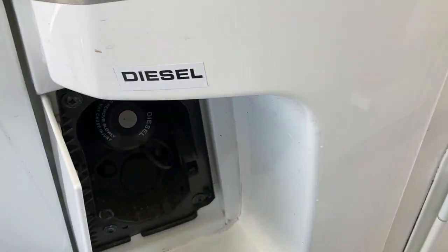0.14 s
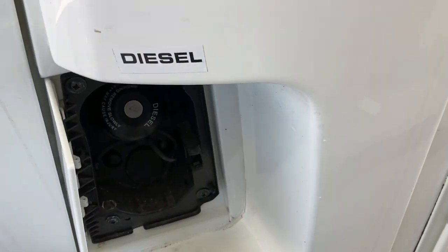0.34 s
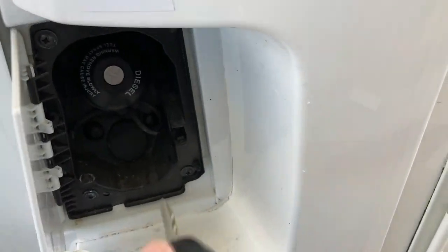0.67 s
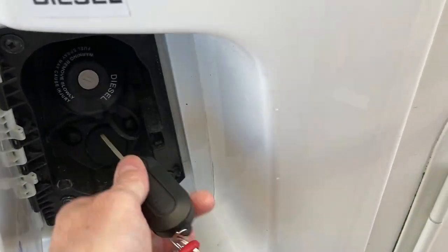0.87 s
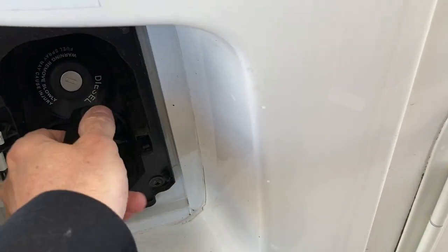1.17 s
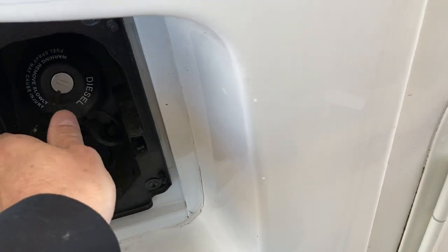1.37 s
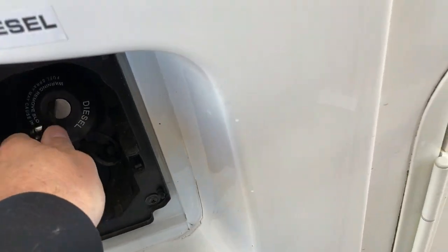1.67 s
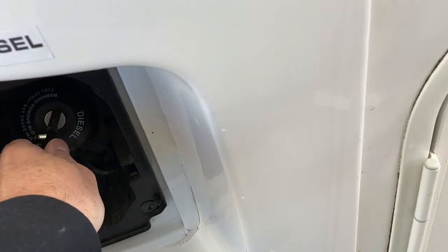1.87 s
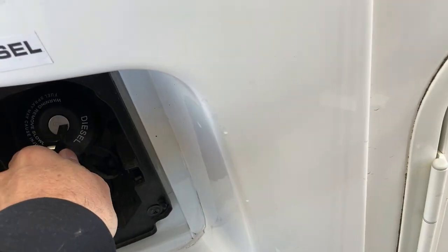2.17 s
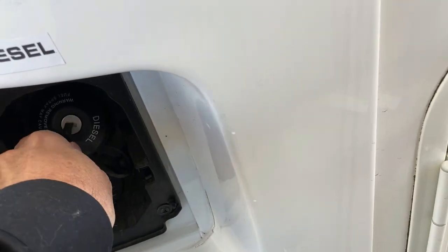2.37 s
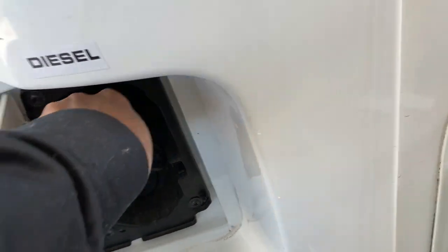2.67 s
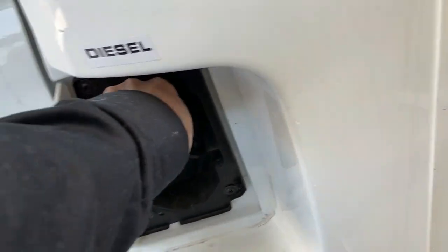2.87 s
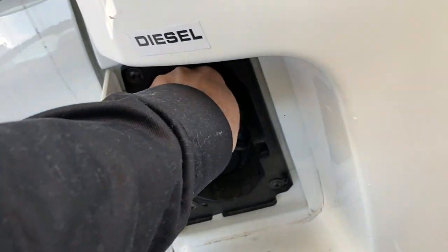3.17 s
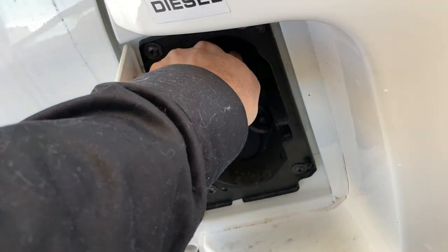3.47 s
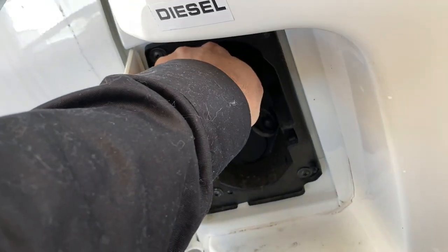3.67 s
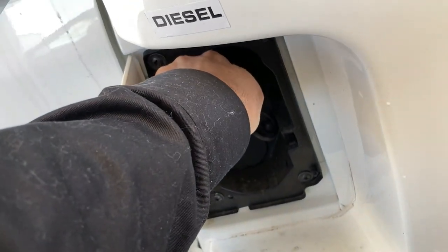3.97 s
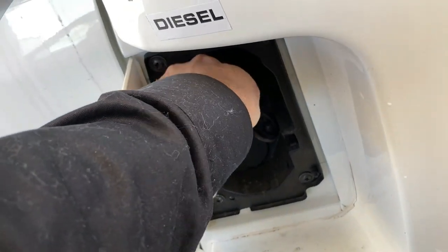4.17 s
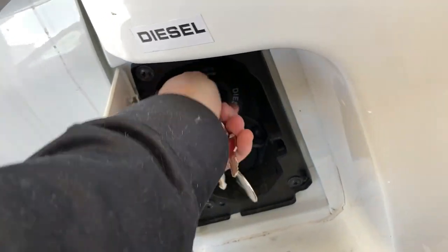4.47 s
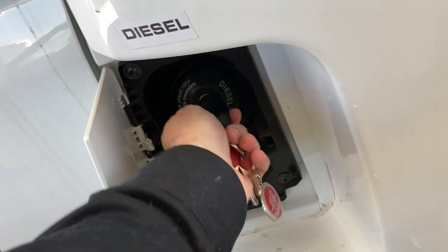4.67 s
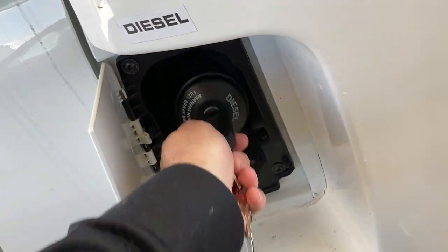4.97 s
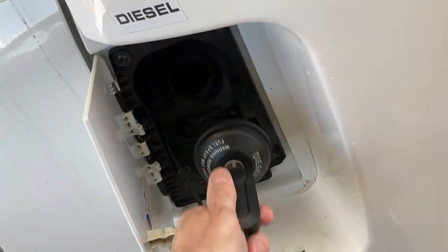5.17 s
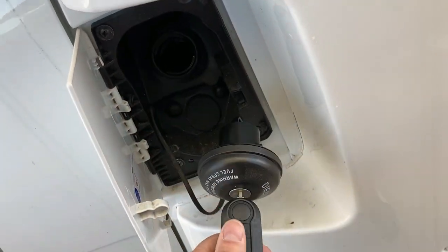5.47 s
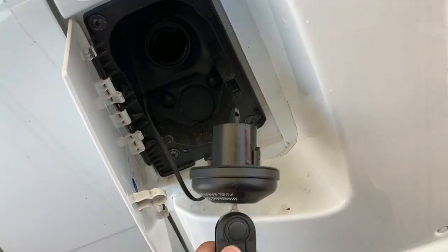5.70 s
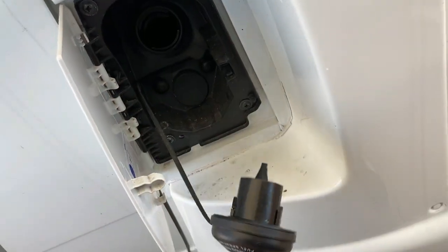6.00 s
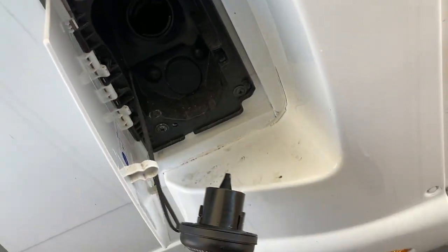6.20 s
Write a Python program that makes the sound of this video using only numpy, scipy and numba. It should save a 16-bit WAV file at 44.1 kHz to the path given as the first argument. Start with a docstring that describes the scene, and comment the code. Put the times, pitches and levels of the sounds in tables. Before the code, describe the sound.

Over a faint low traffic rumble and hum, a bunch of keys jingles brightly while a van door shuts with a deep double thump. Then, very close, a key knocks and scrapes into a hollow plastic fuel cap, with sleeve rustle and soft taps. After a quieter stretch, a loud burst of clacks and rattle frees the cap, leaving small touches.

```python
"""Over a low forecourt rumble and a wavering hum, a bunch of keys jingles as a van's door slams.
A key is then worked into a locking plastic filler cap, with knocks, scrapes and soft taps, until
the cap comes free. Keys, panel and door are fading sine tones; the recess around the filler rings
with the knocks and colours the scrapes; rumble and rustle are shaped noise. Two close microphone
ports hear it all."""
import sys
import numpy as np
from scipy import signal
from scipy.fft import rfft, irfft, next_fast_len
from scipy.io import wavfile
from numba import njit

SR = 44100
rng = np.random.default_rng(int(sys.argv[2]) if len(sys.argv) > 2 else 0)


def store_pcm(level_fs):
    """Save levels as 16-bit WAV."""
    pcm = np.round(np.clip(level_fs, -1, 1) * 32767).astype(np.int16)
    wavfile.write(sys.argv[1], SR, np.atleast_2d(pcm).T)


N = 279578   # length in samples

# Levels in the tables are relative: the functions may add a fixed trim to a whole layer.
# Spectra give the loudness of noise at each pitch: pitch_hz, level_db.
# Modes are the tones a thing rings with: pitch_hz, level_db, t60_s (time to fade by 60 dB).

# spectrum of the forecourt rumble: pitch_hz, level_db
FORECOURT_SPECTRUM = [(25, -31.5), (50, 8.5), (70, 9.5), (110, -3), (160, -6.5), (300, -9), (500, -19),
                      (1000, -34), (2000, -31), (4000, -60.5)]
FORECOURT_DB = -53.5
# low tones of the hum: pitch_hz, level_db
HUM_TONES = [(55, -62.5), (118, -64), (152, -63.5), (236, -56)]

# thumps of the shutting door: start_s, level_db
DOOR_SLAMS = [(.218, -8.5), (0.267, -8)]
# booming modes of the van body: pitch_hz, level_db, t60_s
BODY_BOOM = [(75, -12.5, 0.23), (129.7, 2.5, 0.22), (141.5, 2, 0.26), (175.5, -11.5, 0.39)]
# sheet metal of the door ringing just after the second slam: start_s, then modes (pitch_hz, level_db, t60_s)
DOOR_SKIN_RING = (.275, [(538, -20, 0.19)])
LATCH_S, LATCH_DB = .028, -8   # this long after each slam the latch damps the boom by this much

# hand and arm at the panel: start_s, strain_db, rustle_db
HAND_LEVELS = [(0, -36, -53), (.2, -50, -45.5), (.6, -45.5, -57), (1.0, -50.5, -55.5), (1.22, -45.5, -54.5),
               (1.318, -46, -60.5), (2.05, -48.5, -65.5), (2.17, -46, -60.5), (3.0, -38, -57),
               (3.139, -49.5, -62.5), (4.12, -56.5, -65), (4.34, -42, -59.5), (4.652, -40, -57.5),
               (5.5, -58, -61), (6.34, -60, -65)]
# spectrum of the strain rumble: pitch_hz, level_db
STRAIN_SPECTRUM = [(60, -24), (110, 9.5), (180, 0.5), (250, -4.5), (400, -13), (700, -18), (1200, -52)]
# spectrum of the hand and sleeve rustle: pitch_hz, level_db
RUSTLE_SPECTRUM = [(400, -25.5), (800, 11.5), (2000, 9), (4000, 5.5), (8000, 2), (12000, 3.5),
                   (15500, -3.5), (16000, -22)]
# stretches where the rustle fades out and then quickly returns: start_s, end_s
RUSTLE_DIPS = [(3.519, 4.13), (5.5, 5.645)]
DIP_FADE_DB_PER_S, DIP_FADE_S, RETURN_S = 86, 0.31, 0.017

# the clearer bright ticks, mostly of keys touching: start_s, level_db
BRIGHT_TICKS = [(0.1675, -19.5), (0.218, -26), (0.315, -34), (0.396, -31), (0.4351, -23.5), (0.4669, -22.5),
                (0.4874, -23), (0.5218, -18), (0.5543, -28), (0.614, -33), (0.689, -26), (0.6949, -28.5),
                (0.7193, -23), (0.909, -31), (0.9655, -38), (1.014, -37), (1.051, -29), (1.115, -30),
                (1.1555, -30.5), (1.174, -26), (1.206, -21), (1.246, -34), (1.6358, -23), (2.34, -32),
                (2.7073, -28), (2.875, -26.5), (4.13, -49), (4.6216, -9)]
# spectrum of a tick: pitch_hz, level_db
TICK_SPECTRUM = [(1500, -24), (4000, -3.5), (5500, 5), (7500, 5), (9000, 6.5), (12000, 1.5), (14500, -7.5),
                 (17000, -28)]
# what an early tick leaves sounding: pitch_hz, level_db, t60_s
TICK_MODES = [(2275, -17, 0.02), (4120, -10, 0.0097), (15050, -15.5, 0.015)]
# while the bunch swings free, faint ticks come at random
SWING_START_S, SWING_END_S, FAINT_TICKS, FAINT_DB = .05, 1.26, 18, -47
# touches that leave the keys ringing: start_s, keys_db, key_ring_db, held_s (until a contact stops it)
KEY_PEALS = [(0.167, -20.5, -14, 0.225), (0.201, -20.5, -30, 0.065), (0.395, -53, -32.5, 0.028),
             (0.441, -36.5, -6, 0.0028), (0.525, -36, -42.5, 0.026), (0.911, -43.5, -60, 0.077),
             (1.016, -37, -31.5, 0.03), (1.111, -27.5, -40, 0.055), (1.192, -29, -30, .012),
             (1.206, -52, -24.5, 0.034), (2.113, -72, -34.5, .07), (4.664, -81, -29, .1)]
# long rings of the keys: pitch_hz, level_db, t60_s
LONG_KEY_MODES = [(4538, -21, .15), (10520, -6, 0.45), (11285, -8, 0.4), (14385, -4, .6), (15112, -6, .5)]
# short clinks of the key ring: pitch_hz, level_db, t60_s
KEY_RING_MODES = [(14245, 0, .11), (13480, -16, .05)]
FLUTTER_HZ, FLUTTER_DB = 30, 3   # swinging keys turn, so each long ring swells and dips
# the long key blade rings once: start_s, then modes (pitch_hz, level_db, t60_s)
BLADE_RING = (0.16, [(4535, -18, 0.14)])

# knuckle or cap tapping something soft: start_s, level_db
SOFT_TAPS = [(1.797, -36), (1.849, -38), (1.8826, -31), (2.116, -16), (4.931, -35), (5.1770, -35.5),
             (5.52, -46)]
# modes of a soft tap: pitch_hz, level_db, t60_s
TAP_MODES = [(460, 0, 0.032), (800, 0, 0.014), (1055, -8, 0.043), (1890, -0.5, 0.011)]

# modes of the recess: spacings above the lowest (a count), width_hz (before widening), level_db
RECESS_MODES = [(0, 320, 0), (1, 340, -9), (1.8, 400, -36)]
# the hand and then the cap fill or free the recess and so shift its pitch and colour:
# start_s, lowest_hz, spacing_hz, upper_modes_db
RECESS_CHANGES = [(.5, 2240, 909, 3), (1.3, 1482, 607, -11), (1.72, 1473, 800, -9), (2.11, 1413, 570, -5),
                  (2.56, 1667, 902, 5.5), (2.7, 1600, 660, 6), (3.0, 1620, 700, 7), (3.64, 1600, 800, 4),
                  (3.7, 1900, 880, 1.5), (4.3, 1800, 800, 8), (4.48, 1663, 670, 4), (4.526, 2175, 551, 6.5),
                  (4.55, 1733, 700, -21.5), (6.3, 1827, 986, 4)]
# plastic sliding on plastic: start_s, end_s, start_db, end_db, hiss_db (relative to the ringing)
SCRAPE_STROKES = [(1.286, 1.468, -46, -60, -6.5), (1.637, 1.777, -47.5, -38, -12),
                  (1.753, 2.035, -54, -57.5, -28), (2.081, 2.144, -55, -36, -12),
                  (2.324, 2.36, -66.5, -33, -22), (2.548, 2.627, -46, -46.5, -25),
                  (2.665, 3.024, -54.5, -40.5, -24), (3.652, 3.86, -37.5, -80.5, 3),
                  (4.287, 4.352, -33, -62.5, -1.5), (4.379, 4.488, -58.5, -53, 7),
                  (4.509, 4.554, -43, -41, -13), (4.556, 4.607, -26.5, -31, -11),
                  (4.599, 4.631, -34.5, -28, -4), (4.614, 4.668, -17.5, -46.5, -1),
                  (4.761, 4.84, -47.5, -44.5, -29), (4.836, 4.897, -46.5, -48, -6.5),
                  (5.058, 5.127, -41, -43.5, -14), (5.49, 5.56, -74.5, -74, 17.5),
                  (5.971, 6.025, -42, -61, -10), (6.204, 6.255, -46.5, -65, -10)]
# spectrum of the scrape hiss: pitch_hz, level_db
SCRAPE_HISS_SPECTRUM = [(250, 12.5), (500, 12), (2000, 1), (4000, -7), (6000, -2), (9000, -4), (14500, -24)]
# plastic knocking on plastic: start_s, level_db, then thud_db and snap_db relative to that level
PLASTIC_KNOCKS = [(0.166, -26.5, -47, -1.5), (0.421, -42, -17.5, -11), (0.46, -44, -12, -11),
                  (0.4885, -31.5, -27, -28), (1.312, -9, -16, -22), (1.508, -17.5, -16.5, -22),
                  (1.637, -21, -9, -11), (1.733, -18.5, -37, -14), (1.742, -23, -32, -27),
                  (1.9027, -33.5, 9.5, 0), (2.105, -20, -6, -5.5), (2.113, -24, -1, 9),
                  (2.119, -35, 23.5, -20), (2.3085, -34.5, -34.5, -36), (2.3485, -39, 8, -26),
                  (2.364, -50, 27, 22), (2.5622, -30.5, -29.5, -1), (2.584, -35, -19, -17),
                  (2.5964, -46, -5, 10.5), (2.8103, -32, 4, -32), (2.854, -37, -9, 0),
                  (2.97, -24, -19.5, -13), (2.989, -26.5, -2.5, -30), (3.094, -49.5, -7, 7),
                  (3.643, -49, 0, 13.5), (4.2328, -58, -13, 20), (4.2934, -31, 9, 6.5),
                  (4.3275, -38.5, 12, -2), (4.449, -25, 5, -7.5), (4.527, -19, -32.5, -5.5),
                  (4.566, -36, 20, -8), (4.576, -10.5, -1, -8.5), (4.6232, -18.5, 17, 12.5),
                  (4.6297, -20.5, 17, -27), (4.646, -30.5, 21, -29), (4.667, -40, 19, 16.5),
                  (4.778, -29.5, -5, -4.5), (4.98, -26, 11, 5), (5.109, -34, -34, -6),
                  (5.931, -52, -25, -13), (5.982, -31, -28, -7), (6.159, -49, -20, -2),
                  (6.309, -57, -27, -5)]
# spectrum of the snap: pitch_hz, level_db
SNAP_SPECTRUM = [(1500, -5.5), (2500, -5.5), (3200, -9), (5000, -9), (8500, -10.5), (12000, -13.5),
                 (17000, -27)]
# body panel around the filler: pitch_hz, level_db, t60_s
PANEL_MODES = [(131, 2, 0.065), (180, 3, 0.06), (240, 5, 0.06), (340, 9, 0.04), (450, 8, 0.03),
               (620, 2, 0.02)]
KNOCK_T60_S = 0.01

# how far the left port leads: pitch_hz, lead_radians
PORT_LEAD = [(0, 0), (1550, .4), (3400, 1.9), (4600, 1.7), (7400, 5.2), (11100, 9.0), (12300, 9.7),
             (14000, 11.8), (15500, 12.7), (22050, 18)]
# left port over right port: pitch_hz, difference_db
PORT_TILT = [(200, 0), (600, 4.5), (1500, -2), (3000, 0)]
# scattered part that the ports hear with opposite sign: pitch_hz, level_db
PORT_UNLIKE = [(200, -30), (400, -16), (700, -5), (1500, -8), (2600, -8), (5400, -13), (12000, -28)]
CUTOFF_HZ = 16300


def from_db(db):
    """Turn decibels into a plain multiplier."""
    return 10 ** (np.asarray(db) / 20)


def rms_one(x):
    """Scale a signal to an average strength (rms) of 1."""
    return x / np.sqrt(np.mean(x ** 2) + 1e-20)


def at_hz(points, hz):
    """Read a table between its points, with pitch on a logarithmic scale."""
    pitch, value = np.transpose(points)
    return np.interp(np.log(hz + 1), np.log(pitch + 1), value)


def coloured(x, spectrum):
    """Shape a signal by a spectrum; rms 1."""
    size = next_fast_len(N)
    hz = np.arange(size // 2 + 1) * SR / size
    return rms_one(irfft(rfft(x, size) * from_db(at_hz(spectrum, hz)), size)[:N])


def noise(spectrum):
    """Random noise shaped by a spectrum; rms 1."""
    return coloured(rng.standard_normal(N), spectrum)


def drift(rate):
    """Slow random wandering with spread 1; a higher rate in Hz wanders faster."""
    r = np.exp(-2 * np.pi * rate / SR)
    wander = signal.lfilter([1], [1, -2 * r, r * r], rng.standard_normal(N + SR))
    return rms_one(wander[SR:])   # skip the filter's first second


def add(out, s, sound):
    """Mix a sound in, starting at s seconds."""
    at = round(s * SR)
    out[at:at + len(sound)] += sound[:N - at]


def rings(t, modes, spread_db):
    """Decaying sines, each struck with a random strength and phase of its own."""
    hz, db, t60 = np.transpose(modes)[:, :, None]
    strength, phase = rng.standard_normal((2, len(modes), 1))
    level = from_db(db + spread_db * strength - 60 * t / t60)
    return np.sum(level * np.sin(2 * np.pi * hz * t + 0.91 * phase), axis=0)


def burst(t, colour, s, t60, tail_db, tail_t60):
    """A crack of coloured noise that swells for a moment, with a weak, longer tail from nearby metal."""
    swell = 1 - np.exp(-(t / .002) ** 2)
    piece = np.resize(colour[round(s * SR):], len(t)) * swell
    return piece * (from_db(-60 * t / t60) + from_db(tail_db - 60 * t / tail_t60))


@njit
def moving_resonance(x, hz, width, rate):
    """Let a signal ring at a pitch that may move; a wider resonance fades sooner."""
    out, r = np.zeros(len(x)), np.exp(-np.pi * width / rate)
    for i in range(2, len(x)):
        drive = (1 - r * r) / 2 * (x[i] - x[i - 2])
        out[i] = drive + 2 * r * np.cos(2 * np.pi * hz[i] / rate) * out[i - 1] - r * r * out[i - 2]
    return out


def recess_at(s):
    """Lowest pitch of the recess at a time, with the spacing and level of its upper modes."""
    when, *columns = np.transpose(RECESS_CHANGES)
    return [np.interp(s, when, c) for c in columns]


def forecourt():
    """Traffic rumble and a hum of low tones that waver a little in pitch and level."""
    hum = np.zeros(N)
    for hz, db in HUM_TONES:
        level = from_db(db + 0.5 + 1.5 * drift(2.9))
        pitch = hz * (1 + 0.01205 * drift(4.044))
        hum += level * np.sin(2 * np.pi * np.cumsum(pitch) / SR)
    return from_db(FORECOURT_DB + 0.57 * drift(3.6)) * noise(FORECOURT_SPECTRUM) + hum


def door():
    """The body modes swell after each slam until the latch damps them, over a rumble that dies away."""
    out, t = np.zeros(N), np.arange(SR) / SR
    swell = (1 - np.exp(-t / 0.013)) ** 2
    latch = from_db(LATCH_DB * np.clip((t - LATCH_S) / 0.02, 0, 1))
    for s, db in DOOR_SLAMS:
        add(out, s, from_db(db) * swell * latch * rings(t, BODY_BOOM, 0.82))
    skin_s, skin_modes = DOOR_SKIN_RING
    add(out, skin_s, swell * rings(t, skin_modes, 1))
    rumble_level = from_db(-23.0 - 60 * t / 1.0) * (1 - np.exp(-t / 0.015))
    add(out, DOOR_SLAMS[0][0], rumble_level * noise(STRAIN_SPECTRUM)[:SR])
    return out


def hand_work():
    """Strain rumbles in the panel, hand and sleeve rustle; the rustle fades in the listed dips."""
    t = np.arange(N) / SR
    s, *columns = np.transpose(HAND_LEVELS)
    strain_db, rustle_db = [np.interp(t, s, c) for c in columns]
    for start, end in RUSTLE_DIPS:
        fade_db = DIP_FADE_DB_PER_S * np.clip(t - start, 0, DIP_FADE_S)
        rustle_db = rustle_db - fade_db * np.clip((end - t) / RETURN_S, 0, 1)
    strain = noise(STRAIN_SPECTRUM) * from_db(3.15 * drift(15))
    rustle = noise(RUSTLE_SPECTRUM) * from_db(2.5 * drift(23))
    return from_db(strain_db) * strain + from_db(rustle_db) * rustle


def keys():
    """Each touch is a bright tick; listed ones set keys and ring sounding until a contact damps them."""
    out, t, colour = np.zeros(N), np.arange(SR // 3) / SR, noise(TICK_SPECTRUM)
    swing_s = SWING_END_S - SWING_START_S
    faint = [(SWING_START_S + a * swing_s, FAINT_DB + 6 * b) for a, b in rng.random((FAINT_TICKS, 2))]
    for s, tick_db in BRIGHT_TICKS + faint:
        add(out, s - .001, from_db(tick_db + 6.0) * burst(t, colour, s, 0.0087, -16, 0.035))
        if s < SWING_END_S:
            add(out, s, from_db(tick_db) * rings(t, TICK_MODES, 3.4))
    flutter = [drift(FLUTTER_HZ) for mode in LONG_KEY_MODES]
    for s, keys_db, ring_db, held in KEY_PEALS:
        damping = from_db(-1400 * np.maximum(t - held, 0))   # 1400 dB per second once touched
        free = damping * (1 - np.exp(-t / 0.00021))
        for mode, turning in zip(LONG_KEY_MODES, flutter):
            sway = from_db(FLUTTER_DB * turning[round(s * SR):][:len(t)])
            add(out, s, from_db(keys_db) * free * sway * rings(t, [mode], 2.5))
        add(out, s, from_db(ring_db) * free * rings(t, KEY_RING_MODES, 0.48))
    blade_s, blade_modes = BLADE_RING
    add(out, blade_s, (1 - np.exp(-t / 0.00056)) * rings(t, blade_modes, 0.75))
    return out


def taps():
    """Soft contacts give short, dull, broad sounds with hardly any ring."""
    out, t = np.zeros(N), np.arange(SR // 20) / SR
    for s, db in SOFT_TAPS:
        add(out, s, from_db(db) * (1 - np.exp(-t / 0.0015)) * rings(t, TAP_MODES, 1.8))
    return out


def scrapes():
    """Dense uneven slips ring in the recess and hiss; each stroke fades in and out."""
    t = np.arange(N) / SR
    ring_level, hiss_level = np.zeros(N), np.zeros(N)
    pitch, spacing, upper_db = recess_at(t)
    for start, end, start_db, end_db, hiss_db in SCRAPE_STROKES:
        fade_s = min(0.28 * (end - start), .04)
        stroke = np.clip(np.minimum(t - start, end - t) / fade_s, 0, 1)
        level = stroke * from_db(np.interp(t, [start, end], [start_db, end_db]))
        ring_level += level
        hiss_level += level * from_db(hiss_db)
    # about 4000 fine slips a second, plus 70 coarser catches
    slips = (rng.random(N) < 4000 / SR) * rng.standard_normal(N) * from_db(2.4 * drift(80))
    slips += (rng.random(N) < 70 / SR) * from_db(5) * rng.standard_normal(N)
    waver = 1 + .025 * drift(20)
    ring = slips
    for stage in range(2):   # twice through the recess keeps the valleys between modes dark
        passed = np.zeros(N)
        for k, width, db in RECESS_MODES:
            gain = from_db((db + upper_db * (k > 0)) / 2)   # half the decibels at each pass
            passed += gain * moving_resonance(ring, (pitch + spacing * k) * waver, 1.2 * width, SR)
        ring = passed
    hiss = noise(SCRAPE_HISS_SPECTRUM) * from_db(2.0 * drift(35))
    return ring_level * rms_one(ring) + hiss_level * hiss


def knocks():
    """A soft contact swells the air in the recess, snaps in the treble and thuds in the panel."""
    out, t, colour = np.zeros(N), np.arange(SR // 4) / SR, noise(SNAP_SPECTRUM)
    air_swell = (1 - np.exp(-t / 0.0021)) ** 2
    thud_swell = 1 - np.exp(-t / 0.0045)
    for s, db, thud_db, snap_db in PLASTIC_KNOCKS:
        hz, spacing, upper_db = recess_at(s)
        recess = [(hz + spacing * k, mode_db + upper_db * (k > 0), KNOCK_T60_S)
                  for k, width, mode_db in RECESS_MODES]
        add(out, s - .001, from_db(db + 19.5) * air_swell * rings(t, recess, 2.2))
        add(out, s - .001, from_db(db + snap_db - 1.5) * burst(t, colour, s, .022, -22, .08))
        add(out, s, from_db(db + thud_db - 12.5) * thud_swell * rings(t, PANEL_MODES, 2.5))
    return out


def scene():
    """Sound reaches the left port first; a small scattered part arrives opposite at the two ports."""
    size = next_fast_len(N + SR // 4)
    hz = np.arange(size // 2 + 1) * SR / size
    mix = forecourt() + door() + hand_work() + keys() + taps() + scrapes() + knocks()
    spectrum = rfft(mix, size)
    # each port takes half of the lead and half of the level difference
    lead = np.exp(.5j * np.interp(hz, *np.transpose(PORT_LEAD))) * from_db(at_hz(PORT_TILT, hz) / 2)
    echo_t = np.arange(SR // 8) / SR
    echoes = rng.standard_normal(SR // 8) * np.exp(-echo_t / .015)
    smear = rfft(echoes / np.sqrt(np.sum(echoes ** 2)), size) * from_db(at_hz(PORT_UNLIKE, hz))
    left, right = lead * (1 + smear), (1 - smear) / lead
    return irfft(spectrum * np.array([left, right]), size)[:, :N]


def record(dry):
    """A steep low-pass filter cuts the very top of the treble."""
    low_pass = signal.cheby2(12, 70, CUTOFF_HZ + 400, fs=SR, output="sos")   # 70 dB down from there up
    return signal.sosfilt(low_pass, dry)


dry = scene()
out = record(dry)
store_pcm(out)
```